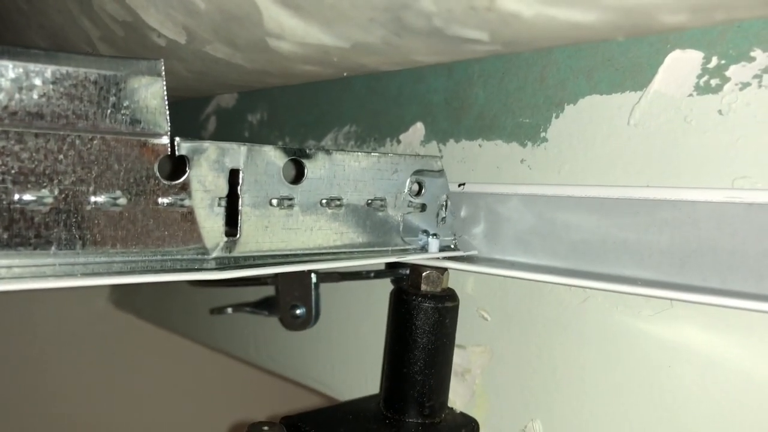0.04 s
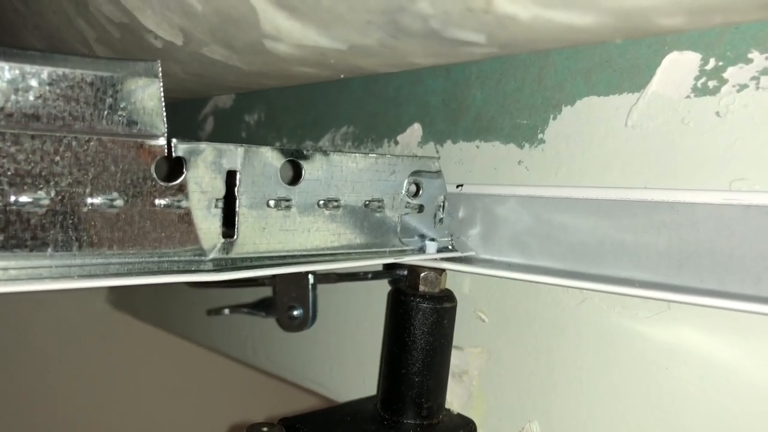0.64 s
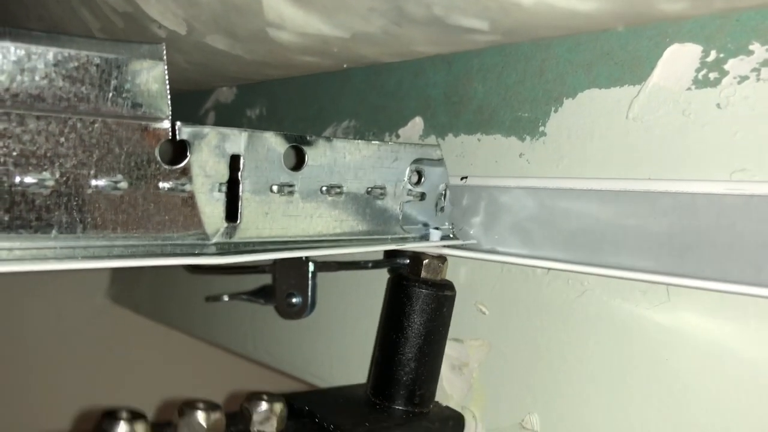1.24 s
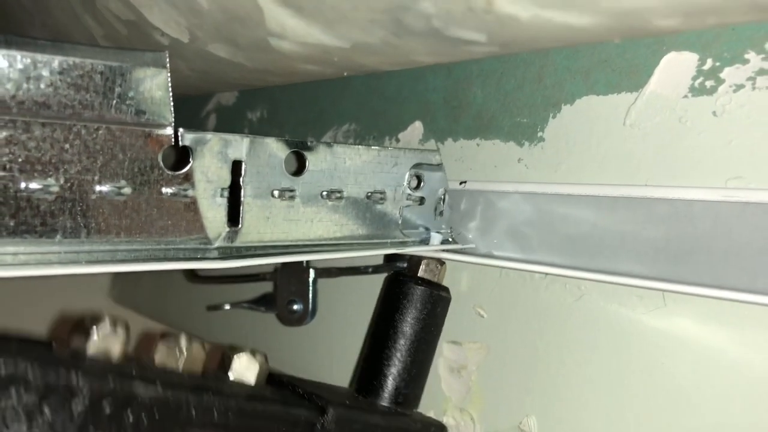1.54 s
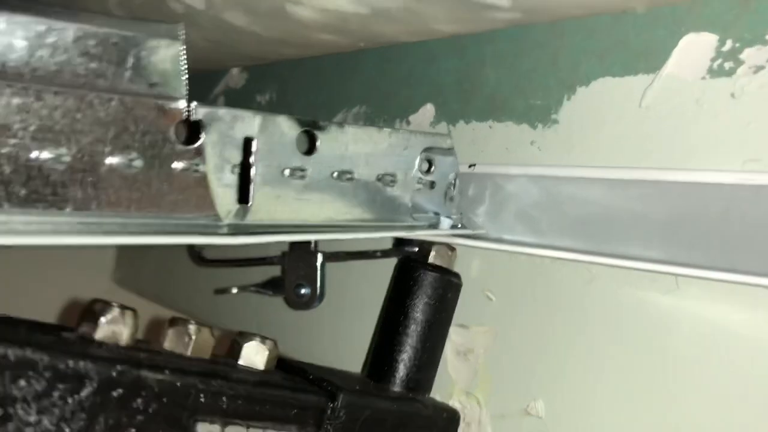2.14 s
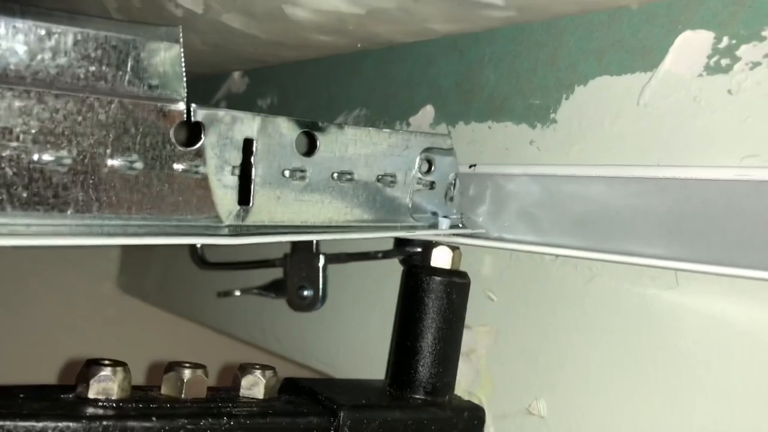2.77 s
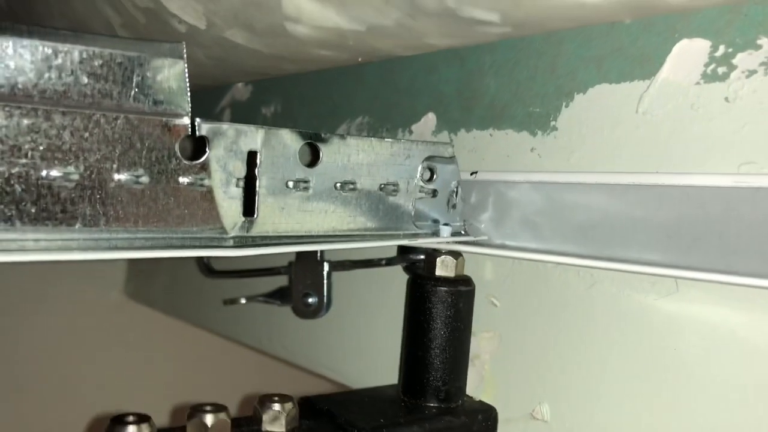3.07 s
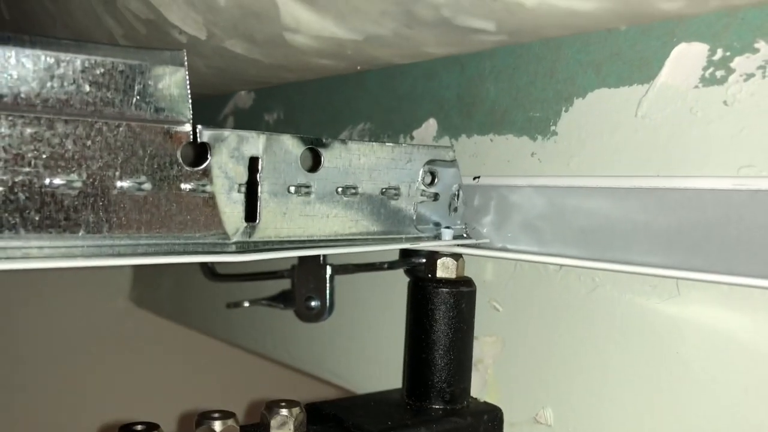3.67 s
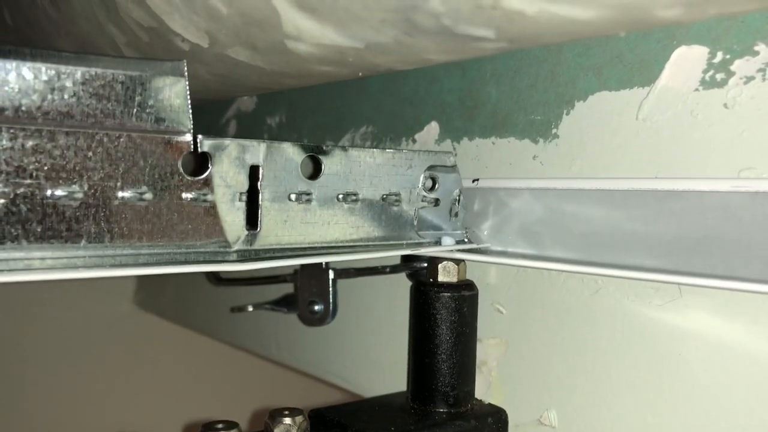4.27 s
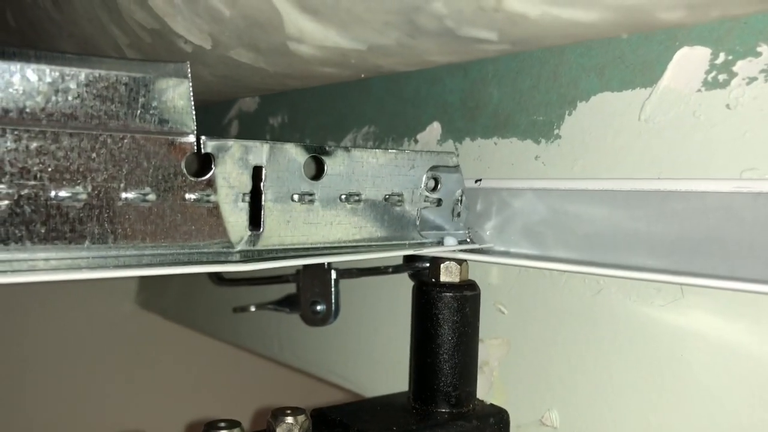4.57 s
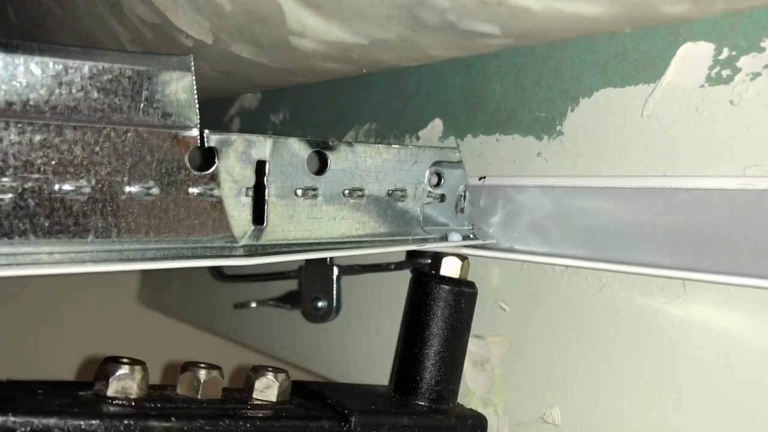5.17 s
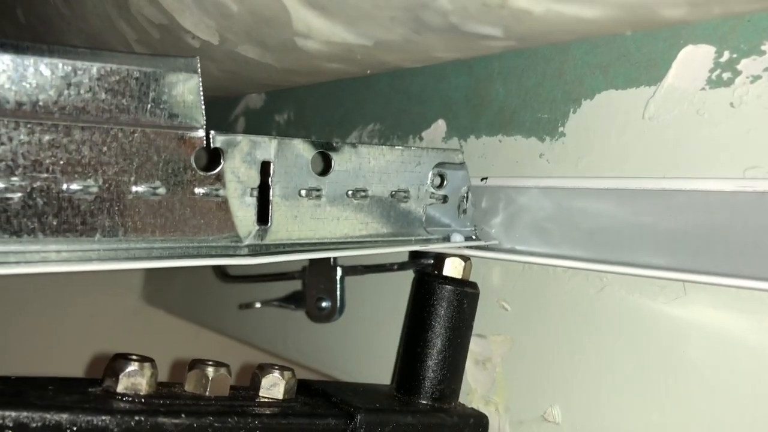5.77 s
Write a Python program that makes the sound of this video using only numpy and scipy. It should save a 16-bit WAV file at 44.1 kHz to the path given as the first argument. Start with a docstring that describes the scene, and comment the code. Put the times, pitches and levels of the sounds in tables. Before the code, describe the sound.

A hand rivet gun is squeezed twice on a steel channel, with sharp metallic cracks, clacks and faint squeaks in a small room.

```python
"""A hand rivet gun, close to the microphone, sets a rivet in a thin steel ceiling channel.
Under each of two squeezes the stem drags and the rivet slips with sharp cracks that ring the channel.
Between the squeezes the handles open: the loose mechanism clacks, the dry pivot squeaks, and the tool
knocks and bumps on the work. The place is a small bare room, with short reflections and a low drone."""
import sys
import numpy as np
from scipy import signal
from scipy.fft import rfft, irfft, next_fast_len
from scipy.io import wavfile
from scipy.ndimage import uniform_filter1d

SR = 44100
rng = np.random.default_rng(int(sys.argv[2]) if len(sys.argv) > 2 else 0)


def unload_audio(sound):
    """Save the sound as a 16-bit wav file, at the path given as the first command line argument."""
    columns = np.transpose(np.atleast_2d(sound))
    # keep every value between -1 and 1, then stretch to whole-number steps
    steps = np.round(np.clip(columns, -1, 1) * 32767)
    wavfile.write(sys.argv[1], SR, steps.astype(np.int16))


N = 256306
TIME = np.arange(N) / SR
AGE = TIME[:SR // 3]   # seconds since the start of one short sound

# the empty room's background: (frequency [Hz], level [dB])
AIR_SPECTRUM = [(15, -74), (25, -36.5), (138, -7), (197, -19), (524, -26.5), (600, -35), (669, -30),
                (766, -36.5), (11900, -50.5), (16500, -61.5)]
# reflections off the bare walls: (frequency [Hz], level [dB], t60 [s])
ROOM_DECAY = [(59.7, 6.5, .6), (131, 11.5, .6), (300, -8, 0.23), (870, -7.5, 0.27), (2000, -13, 0.12),
              (5250, -13.5, 0.21), (9000, -23, 0.17), (16250, -16, 0.16)]
# squeezes of the handles: (start [s], length [s], final drag level [dB])
HANDLE_SQUEEZES = [(1.114, .63, -59), (4.66, 0.665, -59.5)]
# the stem dragging through the rivet: (frequency [Hz], level [dB])
DRAG_SPECTRUM = [(240, -26), (450, 0.5), (850, -5), (1400, -7), (3200, -8), (6000, -10), (12000, -23.5),
                 (16000, -27.5)]
# the gun's nose shifting on the channel: (start [s], length [s], level [dB])
NOSE_RUBS = [(1.411, 0.089, -57), (1.686, 0.046, -55), (2.019, 0.15, -67), (2.516, 0.14, -56.5),
             (2.96, 0.41, -62.5)]
# the dull rub of the nose: (frequency [Hz], level [dB])
RUB_SPECTRUM = [(100, -25.5), (220, -5.5), (450, -16), (800, -15.5), (1700, -25), (4850, -33),
                (14000, -54.5)]
# a hand sliding on the grip: (frequency [Hz], level [dB])
SLIDE_SPECTRUM = [(2000, -24), (4500, 0), (9000, 1), (13000, -0.5), (16000, 0)]
# soft bumps of tool and hands, and the frame swaying after the slips at 1.445, 1.684, 1.723 # and 5.085 s:
# (time [s], level [dB], pitch [Hz])
SOFT_BUMPS = [(1.065, -50, 121), (1.445, -44.5, 96), (1.684, -41, 117), (1.723, -41.5, 85.3),
              (2.177, -40.5, 214), (2.427, -47.5, 247), (2.555, -32.5, 87), (2.599, -36.5, 120),
              (2.65, -39.5, 78.4), (3.007, -42.5, 95), (3.261, -43, 72.6), (3.343, -48.5, 85),
              (3.822, -41.5, 52), (3.866, -49, 54.4), (5.085, -53.5, 128)]
# dry clicks of the grip: (time [s], level [dB], low edge [Hz])
GRIP_CLICKS = [(0.0452, -59.5, 2780), (0.304, -62, 3100), (1.115, -55, 6960), (1.122, -56, 7000),
               (1.134, -47.5, 6540), (2.1726, -50.5, 1200), (2.1819, -40, 875), (2.434, -58.5, 1500),
               (4.3775, -59, 4460)]
# light touches of steel on steel: (time [s], level [dB])
STEEL_TICKS = [(1.048, -58.5), (1.555, -55), (1.602, -56.5), (2.509, -63.5), (3.13, -51.5), (3.143, -57.5),
               (4.734, -62.5), (4.808, -62.5), (4.827, -57), (4.854, -58), (4.901, -56.5), (4.981, -61)]
# borders of four registers, low to high: (frequency [Hz])
REGISTER_EDGES = [620, 1500, 4500, 9000, 16500]
# a tick's weight in each register: (level [dB])
TICK_REGISTERS = [-5, 1.5, 0.5, -10]
# the dry pivot: (start [s], length [s], pitch [Hz], glide [share of pitch], level [dB], roughness [0-1])
PIVOT_SQUEAKS = [(2.06, 0.051, 3270, -.12, -67.5, 0.93), (2.136, 0.024, 2230, -0.078, -62, 0.44),
                 (2.23, .034, 2465, -0.041, -60, 0.8), (2.522, 0.032, 1300, 0.025, -58, 0.3),
                 (3.107, 0.022, 700, .04, -53, 0.53), (3.132, 0.032, 740, 0.14, -55, 0.4),
                 (3.184, 0.036, 700, 0.105, -57.5, 0.2), (3.287, 0.019, 950, 0.068, -54, .2),
                 (3.307, 0.025, 1270, -0.075, -54.5, 0.54), (4.994, 0.0091, 4020, -0.081, -60, 0.1),
                 (5.2, 0.019, 2790, -0.026, -63.5, .45), (5.398, 0.016, 3840, -0.068, -49, 0.02),
                 (5.717, 0.085, 2316, -0.3, -66, 1)]
# the handle reaching its stop: (time [s], level [dB])
STOP_KNOCKS = [(3.007, -31.5)]
# modes of that knock: (frequency [Hz], level [dB], t60 [s])
STOP_MODES = [(214, -12.5, 0.11), (443, -0.5, 0.053), (555, -12, 0.07), (700, -10, 0.013), (750, 5, 0.031),
              (940, 4, 0.0075), (1380, -7.5, 0.019), (1720, -19, 0.019)]
# the nose tapping the channel: (time [s], level [dB], low edge [Hz], high edge [Hz])
NOSE_TAPS = [(0.367, -48.5, 2240, 6000), (0.694, -55.5, 503, 2000), (0.738, -61, 450, 6100),
             (0.8243, -34.5, 450, 9000), (3.279, -55, 700, 4500), (4.3823, -43.5, 300, 2070),
             (4.402, -54.5, 300, 1790), (4.719, -52, 700, 3570)]
# the loose mechanism as the handles move: (time [s], level [dB])
MECHANISM_CLACKS = [(1.8533, -58.5), (1.994, -48.5), (2.04, -58), (2.215, -52), (2.4389, -57),
                    (2.7095, -45), (2.866, -45.5), (2.9657, -46.5), (3.1767, -43.5), (3.303, -45),
                    (3.4872, -41.5), (3.537, -56), (3.6169, -52.5), (3.9379, -49.5), (5.2414, -42),
                    (5.292, -57), (5.4266, -45.5), (5.6828, -45)]
# modes of the gun: (frequency [Hz], level [dB], t60 [s])
GUN_MODES = [(898, -3, 0.017), (1230, -19, 0.099), (1482, -1, 0.015), (2710, -12, 0.021), (3530, -8, 0.031),
             (4060, -22, 0.03), (5230, 2, 0.017), (5600, 8, 0.0071), (5920, 1.5, 0.0086),
             (8000, -28, 0.018), (7740, -53, 0.019), (11060, -7.5, 0.032), (12500, -14, 0.016),
             (13900, -8, 0.03)]
# low modes of the handles: (frequency [Hz], level [dB], t60 [s])
HANDLE_MODES = [(392, 5.5, 0.03), (481.5, 5, 0.027)]
# modes of the steel channel: (frequency [Hz], level [dB], t60 [s])
CHANNEL_MODES = [(746, -2, 0.15), (850, -2, 0.098), (1040, -7, .08), (1218, -9.5, 0.097), (1546, -6, 0.052),
                 (2010, -11.5, 0.039), (2725, -13, 0.19), (2975, -8.5, .08), (3290, -12.5, 0.24),
                 (3270, -3, .13), (3600, -8, .13), (3900, -10, 0.077), (4900, -7.5, .06), (6160, -1, 0.046),
                 (9400, -4, 0.052)]
# the rivet slipping under load:
# (time [s], level [dB], relative thud [dB], relative body [dB], ping pitch [Hz], relative ping [dB])
RIVET_CRACKS = [(1.2576, -31, -21.5, 1, 5730, 4), (1.4447, -30.5, -21, -5.5, 8430, 4.5),
                (1.448, -33.5, -13.5, -3, 6180, 5), (1.5064, -38, -13.5, 3, 8300, -3),
                (1.5096, -38.5, -23.5, -1.5, 3900, -13.5), (1.574, -29.5, -18.5, -8, 8440, -4),
                (1.6786, -25, -12.5, 3.5, 2780, -5), (1.702, -37.5, -31, -5, 5400, -10),
                (1.719, -37.5, -4.5, -1.5, 5470, -9), (4.475, -35, -17.5, 4, 1900, -14),
                (4.8711, -23, -27, -7, 5800, -4), (5.0424, -29.5, -15.5, 1, 2960, -7),
                (5.0635, -42.5, -14, 9, 3530, -21), (5.079, -35.5, -12, -1, 6000, -1),
                (5.2657, -31, -36, -7, 5760, 1)]

PIVOT_HZ, PIVOT_WIDTH_HZ, PIVOT_BOOST_DB = 2440, 170, 6.5   # the resonance shared by all squeaks
SPIKE_DB, SPIKE_PER_DB, TYPICAL_CRACK_DB = -6, 1.1, -28   # hard slips spike, weak ones only crunch
CUTOFF_HZ = 16000   # top of the microphone's range


def from_db(db):
    """Decibels to gain."""
    return 10 ** (np.asarray(db) / 20)


def rms_one(x):
    """Scale to unit rms."""
    return x / np.sqrt(np.mean(x ** 2) + 1e-20)


def unit_hit(x):
    """Scale a blow so that its loudest 4 ms have unit rms."""
    return x / np.sqrt(uniform_filter1d(x ** 2, SR // 250, mode="constant").max() + 1e-20)


def band(x, low_hz, high_hz, order=2):
    """Causal band-pass."""
    edges = [min(low_hz, .8 * high_hz), min(high_hz, .45 * SR)]
    return signal.sosfilt(signal.butter(order, edges, "band", fs=SR, output="sos"), x + 1e-18)


def resonate(x, hz, width_hz):
    """One resonance, gain 1 at its peak."""
    radius = np.exp(-np.pi * width_hz / SR)
    feedback = [1, -2 * radius * np.cos(2 * np.pi * hz / SR), radius ** 2]
    return signal.lfilter(np.array([1, 0, -1]) * (1 - radius ** 2) / 2, feedback, x + 1e-18)


def coloured(x, spectrum):
    """Give a steady sound a spectrum, at unit rms."""
    hz, db = np.transpose(spectrum)
    size = next_fast_len(N)
    bins = np.maximum(np.fft.rfftfreq(size, 1 / SR), 1)
    gains = from_db(np.interp(np.log(bins), np.log(hz), db))
    return rms_one(irfft(rfft(x, size) * gains, size)[:N])


def add(out, time, sound):
    """Mix a sound in at a time in seconds."""
    start = max(round(time * SR), 0)
    out[start:start + len(sound)] += sound[:max(N - start, 0)]


def fade(t60):
    """Exponential decay of 60 dB in t60 seconds."""
    return from_db(-60 * AGE / t60)


def stroke(start, length, attack_s, release_s):
    """Envelope of a hand movement: it swells, holds, then falls 60 dB in the release time."""
    age = TIME - start
    return np.clip(age / attack_s, 0, 1) * from_db(-60 * np.maximum(age - length, 0) / release_s)


def ring(modes, spread_db=2.5):
    """Struck modes; every blow shares its force among them a little differently."""
    out = 0
    for k, (hz, db, t60) in enumerate(modes):
        gain = (-1) ** k * from_db(db + spread_db * rng.standard_normal())
        out += gain * fade(t60) * np.sin(2 * np.pi * hz * AGE)
    return out


def clatter(front_t60, tail_t60, tail_db):
    """Crowded, heavily damped modes of thin steel: a hard front and a longer after-ring."""
    return rng.standard_normal(len(AGE)) * (fade(front_t60) + from_db(tail_db) * fade(tail_t60))


def voiced(blow, levels_db):
    """Weigh the four registers of a blow, from low to high."""
    registers = zip(levels_db, REGISTER_EDGES, REGISTER_EDGES[1:])
    return sum(from_db(db) * unit_hit(band(blow, low, high, order=3)) for db, low, high in registers)


def sway(hz, t60):
    """The frame swings and shudders at a low pitch."""
    shudder = rms_one(band(rng.standard_normal(len(AGE)), hz / 2, 2 * hz))
    envelope = fade(t60) * (1 - fade(0.0033)) * (1 - AGE / AGE[-1])
    return (np.sin(2 * np.pi * hz * AGE) + .5 * shudder) * envelope


def room_tone(drone_hz=131):
    """The room behind the work: faint hiss and a wavering low drone."""
    drone = resonate(rng.standard_normal(N), drone_hz, width_hz=24)
    drone = rms_one(resonate(drone, drone_hz, width_hz=48))
    air = coloured(rng.standard_normal(N), AIR_SPECTRUM)
    return from_db(-62.5) * air + from_db(-64.5) * drone


def reflections(x, build_s=0.0036):
    """Off the nearby walls, diffuse echoes build within milliseconds and die sooner in the treble."""
    hz, db, t60 = np.transpose(ROOM_DECAY)
    age, response = TIME[:SR * 3 // 4], 0
    edges = np.geomspace(40, 18000, 13)
    for low, high in zip(edges, edges[1:]):
        log_centre = np.log(low * high) / 2
        decay = from_db(-60 * age / np.interp(log_centre, np.log(hz), t60))
        tail = band(rng.standard_normal(len(age)), low, high) * decay * (1 - np.exp(-age / build_s))
        tail *= np.sqrt(2 * (high - low) / SR / np.sum(tail ** 2))   # unit gain within the band
        response += tail * from_db(np.interp(log_centre, np.log(hz), db))
    return signal.fftconvolve(x, response)[:N]


def load(rise_db=13):
    """Strength of the stem's drag: it climbs through each squeeze and drops when the hand lets go."""
    out = np.zeros(N)
    for start, length, final_db in HANDLE_SQUEEZES:
        remaining = np.clip(1 - (TIME - start) / length, 0, 1)
        squeeze = stroke(start, length, attack_s=0.075, release_s=0.18)
        out += from_db(final_db - rise_db * remaining) * squeeze
    return out


def frame_strain():
    """The frame rumbles faintly while the handles are squeezed hard."""
    drag = load()
    effort = drag / (drag + from_db(-71.5))
    return from_db(-64) * effort * rms_one(band(rng.standard_normal(N), 40, 150))


def hand_slide():
    """A hand hisses up the grip."""
    envelope = stroke(start=0.95, length=.19, attack_s=0.17, release_s=1.1)
    return from_db(-67) * envelope * coloured(rng.standard_normal(N), SLIDE_SPECTRUM)


def nose_rub(grip_time=.95, attack_s=0.036):
    """The nose rubs as it shifts on the channel; once gripped, it never rests quite still."""
    holding = from_db(-70.5) * np.clip((TIME - grip_time) / attack_s, 0, 1)
    shifting = sum(from_db(db) * stroke(start, length, attack_s, release_s=0.58)
                   for start, length, db in NOSE_RUBS)
    return np.hypot(holding, shifting) * coloured(rng.standard_normal(N), RUB_SPECTRUM)


def stem_drag(slips_per_s=130):
    """Gritty stick-slip of the stem pulling through the rivet, louder as the load builds."""
    slips = (rng.random(N) < slips_per_s / SR) * rng.random(N) ** 2
    grit = rms_one(signal.fftconvolve(slips, fade(0.026))[:N] * rng.standard_normal(N))
    return load() * coloured(grit + .5 * rng.standard_normal(N), DRAG_SPECTRUM)


def bumps(decay_cycles=18.6):
    """Soft bumps, and some of the rivet's slips, set the frame swaying, the lower the longer."""
    out = np.zeros(N)
    for time, db, hz in SOFT_BUMPS:
        add(out, time, from_db(db) * sway(hz, t60=decay_cycles / hz))
    return out


def grip_clicks(width_hz=7500):
    """The grip clicks close to the microphone: single spikes with hardly any ring."""
    out = np.zeros(N)
    for time, db, low_hz in GRIP_CLICKS:
        blow = (AGE == 0) + from_db(-26) * clatter(front_t60=0.019, tail_t60=0.03, tail_db=-21)
        add(out, time, from_db(db) * unit_hit(band(blow, low_hz, low_hz + width_hz)))
    return out


def steel_ticks():
    """Small contacts of steel on steel, each a brief clatter."""
    out = np.zeros(N)
    for time, db in STEEL_TICKS:
        blow = clatter(front_t60=0.004, tail_t60=0.051, tail_db=-9)
        add(out, time, from_db(db) * voiced(blow, TICK_REGISTERS))
    return out


def pivot_squeaks():
    """Stick-slip in the dry pivot: unsteady harmonic squeaks, loudest near its resonance, weak above."""
    out = np.zeros(N)
    for start, length, hz, glide, db, roughness in PIVOT_SQUEAKS:
        progress = np.minimum(AGE / length, 1)
        waver = rms_one(band(rng.standard_normal(len(AGE)), 60, 500))
        pitch = hz * (1 + glide * progress) * (1 + .17 * roughness ** 2 * waver)
        phase = 2 * np.pi * np.cumsum(pitch) / SR
        orders = np.arange(1, CUTOFF_HZ // 2 // hz + 1)
        boost = from_db(PIVOT_BOOST_DB / (1 + ((orders * hz - PIVOT_HZ) / PIVOT_WIDTH_HZ) ** 2))
        rolloff = 1 / (1 + (orders * hz / 3300) ** 4)
        tone = rms_one((boost * rolloff) @ np.sin(np.outer(orders, phase)))
        slip_hiss = rng.standard_normal(len(AGE)) * (1 + np.cos(phase))   # one puff for each slip
        rasp = from_db(-9) * np.sqrt(roughness) * rms_one(band(slip_hiss, 1500, 9000))
        envelope = np.sqrt(4 * progress * (1 - progress))
        add(out, start, from_db(db) * (tone + rasp) * envelope)
    return out


def handle_knock():
    """The padded handle knocks dully against its stop."""
    out = np.zeros(N)
    modes = sum(from_db(db) * fade(t60) * np.sin(2 * np.pi * hz * AGE) for hz, db, t60 in STOP_MODES)
    for time, db in STOP_KNOCKS:
        add(out, time, from_db(db) * band(modes, 95, 4200))
    return out


def nose_taps():
    """The nose taps the unloaded channel: most energy leaves at once, the lower modes ring on."""
    out = np.zeros(N)
    for time, db, low_hz, high_hz in NOSE_TAPS:
        struck = ring(CHANNEL_MODES)
        front = unit_hit(struck * fade(0.038))
        tail = from_db(-19) * unit_hit(band(struck, 780, 3750, order=3))
        contact = from_db(-0.5) * unit_hit(clatter(front_t60=0.0071, tail_t60=0.035, tail_db=-9.5))
        add(out, time, from_db(db) * unit_hit(band(front + tail + contact, low_hz, high_hz)))
    return out


def mechanism_clacks():
    """Slack parts hit their stop and rebound once; the gun rings high, the handles low."""
    out = np.zeros(N)
    for time, db in MECHANISM_CLACKS:
        rebound_s = .0035 * rng.uniform(.7, 1.3)
        for delay, force_db in [(0, 0), (rebound_s, -9)]:
            # the contact is too blunt to ring the gun's highest modes fully
            steel = from_db(3.5) * unit_hit(band(ring(GUN_MODES), 370, 11700))
            rattle = clatter(front_t60=0.012, tail_t60=0.048, tail_db=3.5)
            chatter = from_db(-2) * unit_hit(band(rattle, 720, 7400))
            add(out, time + delay, from_db(db + force_db) * (steel + chatter))
        handle_db = -32 + 0.33 * db   # the low ring grows far more slowly than the clack
        add(out, time, from_db(handle_db) * unit_hit(ring(HANDLE_MODES)))
    return out


def rivet_cracks(sway_hz=212.6):
    """Each slip is a spike and a clatter with one favoured pitch; it rings channel and frame."""
    out, spike = np.zeros(N), unit_hit(1.0 * (AGE == 0))
    for time, db, thud_db, body_db, ping_hz, ping_db in RIVET_CRACKS:
        crunch = unit_hit(clatter(front_t60=0.019, tail_t60=0.024, tail_db=-6.5))
        blow = crunch + from_db(SPIKE_DB + SPIKE_PER_DB * (db - TYPICAL_CRACK_DB)) * spike
        ping = from_db(ping_db) * unit_hit(resonate(blow, ping_hz, width_hz=650))
        # a slip with more body is fuller in the low and middle registers and duller on top
        clank_db, snap_db, sizzle_db = -11.5 + body_db, -3.5 + .8 * body_db, -12.5 - .25 * body_db
        crack = voiced(unit_hit(blow) + ping, [clank_db, snap_db, 0, sizzle_db])
        jolt = clatter(front_t60=0.01, tail_t60=0.046, tail_db=-8)
        thud = unit_hit(band(jolt, 180, 430, order=3))
        swing = from_db(-8) * sway(sway_hz * rng.uniform(.8, 1.3), t60=0.33)
        frame = from_db(thud_db) * (thud + swing)
        loose_joint = band(rng.standard_normal(len(AGE)) * fade(0.24), 800, 4100)
        buzz = from_db(snap_db / 2 - 22) * unit_hit(loose_joint)
        channel = from_db(snap_db - 17) * unit_hit(ring(CHANNEL_MODES))
        add(out, time, from_db(db) * (crack + frame + buzz + channel))
    return out


def scene():
    """One microphone close to the gun; channel and gun carry into the room, the bumps hardly at all."""
    channel = rivet_cracks() + nose_taps()
    gun = mechanism_clacks() + steel_ticks() + pivot_squeaks()
    near = handle_knock() + grip_clicks()
    frame = bumps()
    friction = stem_drag() + nose_rub() + hand_slide()
    direct = channel + gun + near + frame + friction + frame_strain()
    radiated = channel + 1.52 * gun + 0.46 * near + 0.32 * frame
    # the gun beams its high ring at the microphone, so less of that band reaches the walls
    radiated -= 0.49 * resonate(radiated, 5700, width_hz=3000)
    return (direct + reflections(radiated) + room_tone())[None]


def record(dry):
    """The microphone drops the deepest bass; the top is cut steeply."""
    thinned = signal.sosfilt(signal.butter(4, 30, "high", fs=SR, output="sos"), dry)
    return signal.sosfilt(signal.ellip(10, .2, 80, CUTOFF_HZ, fs=SR, output="sos"), thinned)


dry = scene()
out = record(dry)
unload_audio(out)
```